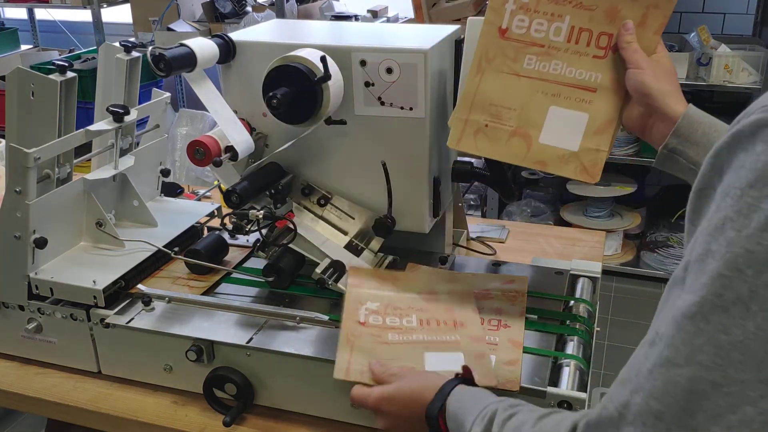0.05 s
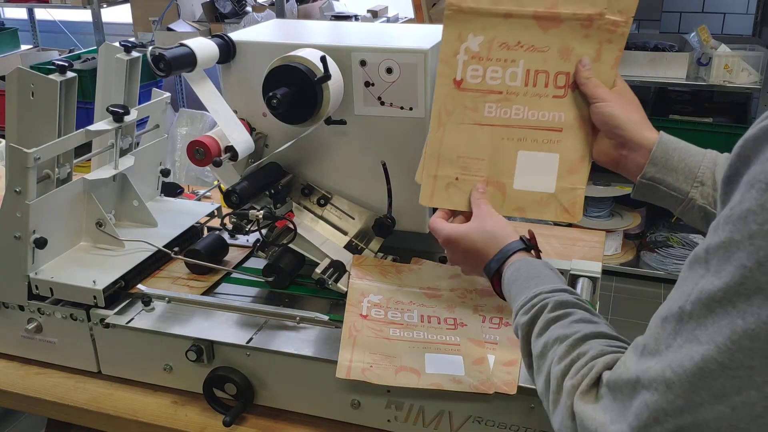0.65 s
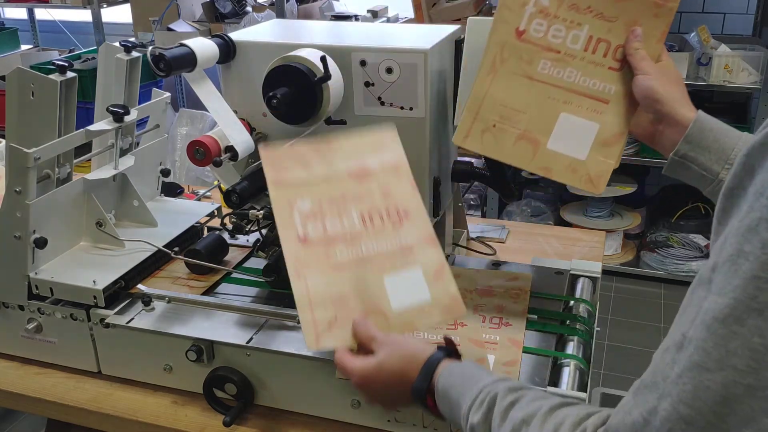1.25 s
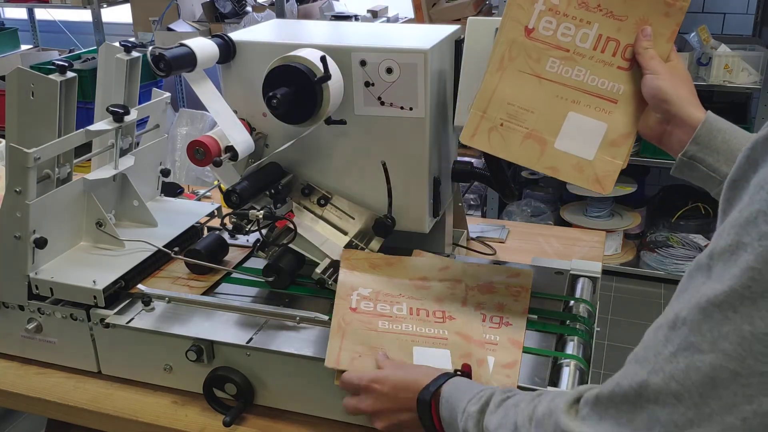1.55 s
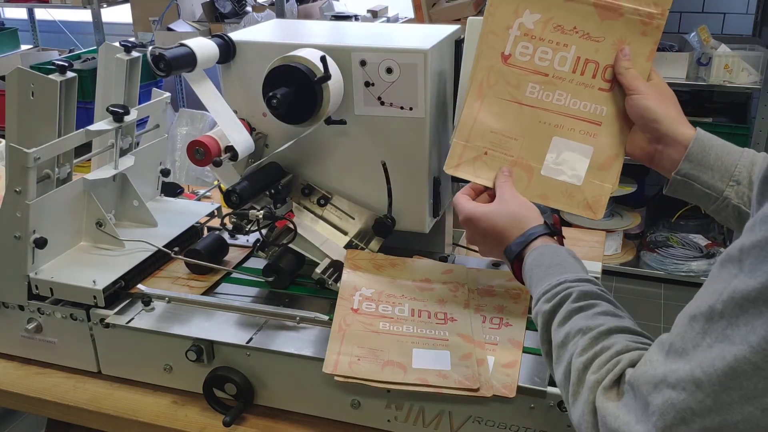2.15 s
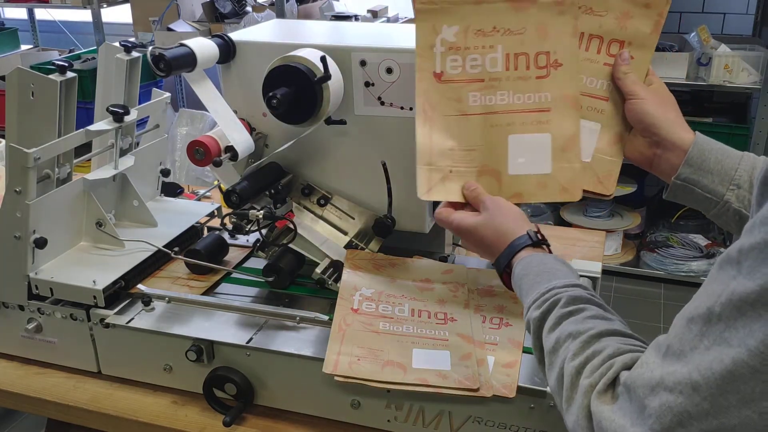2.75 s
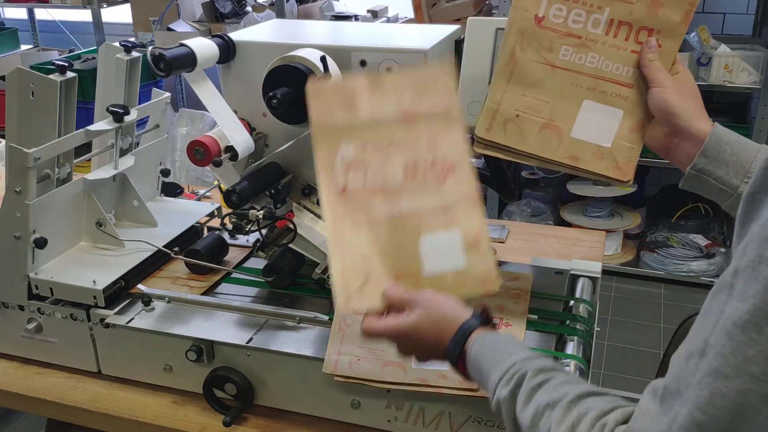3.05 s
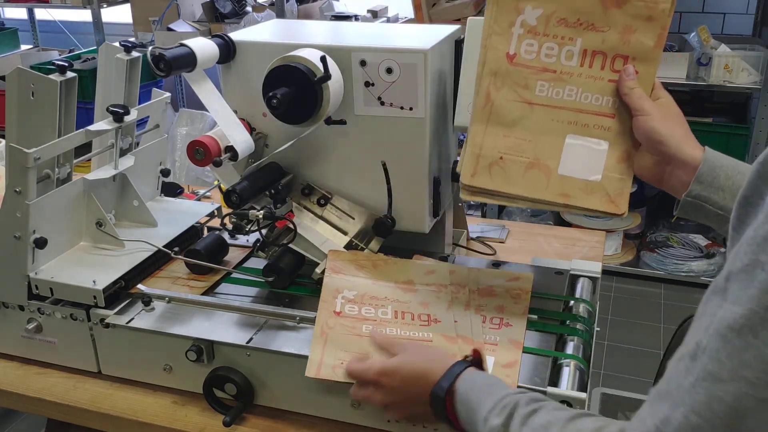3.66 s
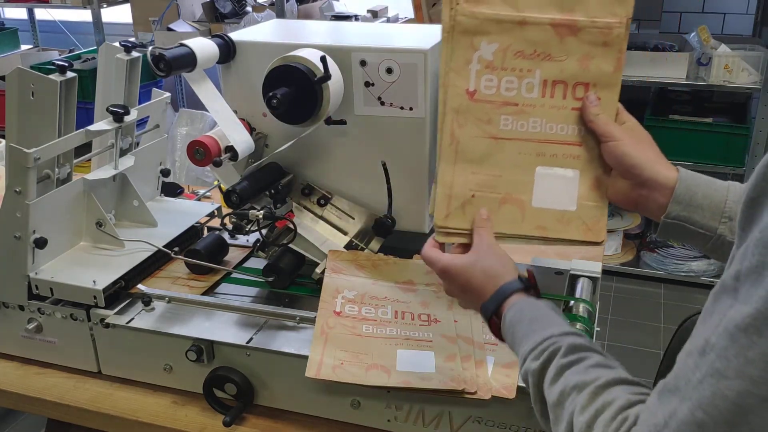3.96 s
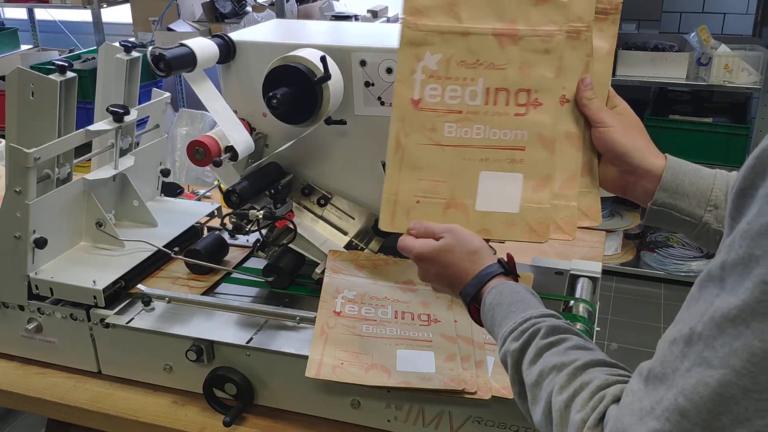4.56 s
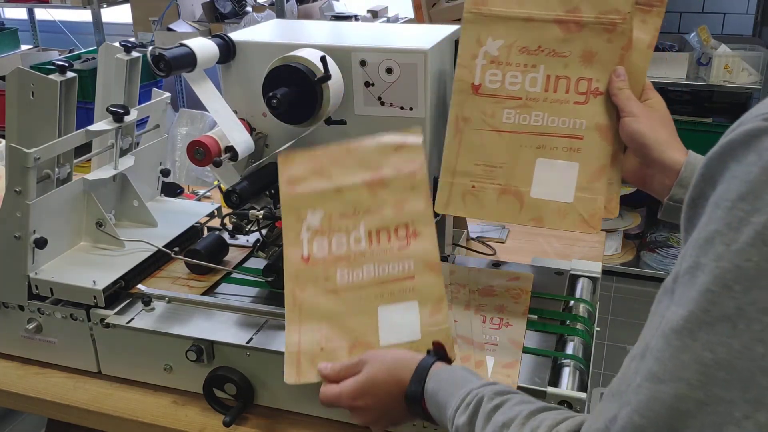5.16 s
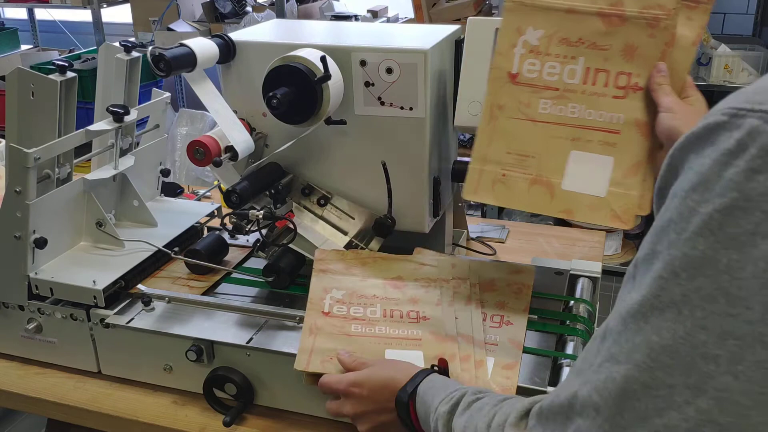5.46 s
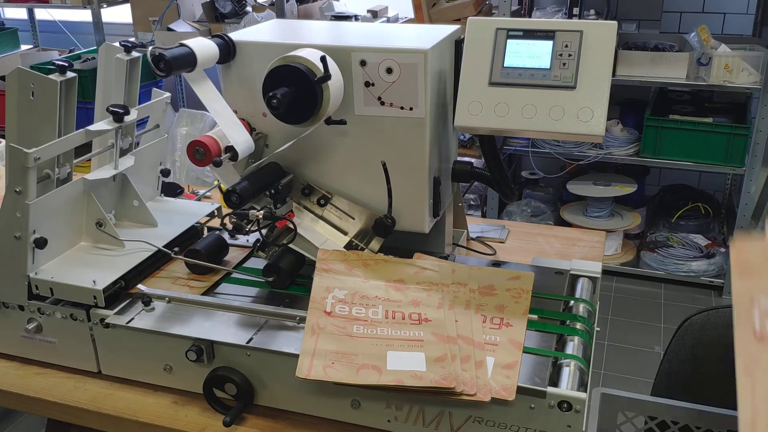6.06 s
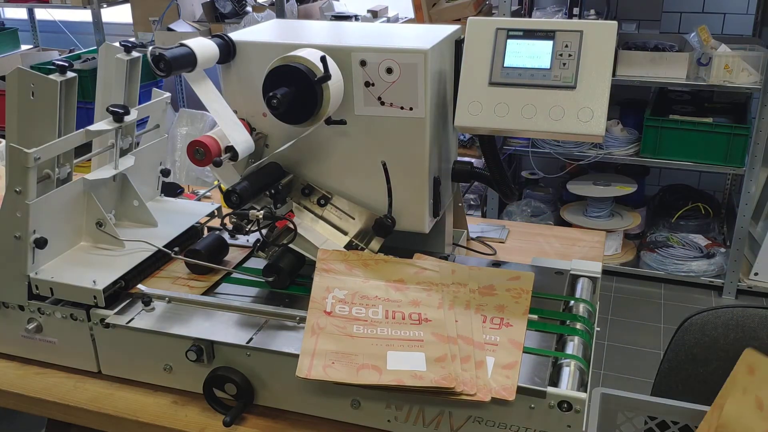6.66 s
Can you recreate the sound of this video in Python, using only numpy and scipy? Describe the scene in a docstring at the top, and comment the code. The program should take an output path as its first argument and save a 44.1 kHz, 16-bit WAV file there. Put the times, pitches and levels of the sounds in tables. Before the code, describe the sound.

In a workshop with a soft steady rush and a faint engine-like hum, paper pouches are handled close by: bright sliding hisses, small crinkles, soft flaps and the brush of a sleeve. A pair of metallic bench knocks comes from farther away early on. Past the middle come two quick knocks and one heavy, ringing blow. The light paper handling carries on to the end.

```python
"""Paper pouches, close to the microphone, slide off a bundle one by one onto the bed of an idle machine.
They hiss as they rub, flap and tick as they flex, and a sleeve brushes along with the arm.
Farther off in the live workshop a metal tool, perhaps a hand press, knocks five times on a bench:
the bench thuds, loose parts clatter, the steel rings thinly. Behind the still air of the room
a faint low hum climbs twice, like an engine outdoors. All is heard in stereo from one spot."""
import sys
import numpy as np
from scipy import signal
from scipy.fft import rfft, irfft, next_fast_len
from scipy.io import wavfile
from scipy.ndimage import uniform_filter1d

SR = 44100
rng = np.random.default_rng(int(sys.argv[2]) if len(sys.argv) > 2 else 0)


def persist_wave(psi):
    """Save psi, clipped to +-1, as 16-bit WAV."""
    counts = np.round(np.clip(psi, -1, 1) * 32767).astype(np.int16)
    wavfile.write(sys.argv[1], SR, np.atleast_2d(counts).T)


N = 304290
T = np.arange(N) / SR
AFTER = T[:SR]  # the second that follows a blow
BRIEF = SR // 3  # samples given to a short paper sound

# Levels in the tables are relative; a balance is left minus right at the microphone.
# reverberation of the workshop: f/Hz, t60/s
WORKSHOP_T60 = [(100, 0.77), (250, 0.49), (500, 0.76), (2000, 0.65), (5000, 0.79), (9000, 0.64),
                (15000, 0.3)]
# still air of the workshop: f/Hz, level/dB
AIR_SPECTRUM = [(12, -48), (20, 2), (70, -2), (96, -10.5), (138, -9.5), (177, -11.5), (337, -18),
                (410, -18.5), (923, -24), (1660, -28.5), (2670, -28), (3440, -29), (4540, -30),
                (6360, -29.5), (16000, -31.5)]
# the air at the microphone: f/Hz, balance/dB
AIR_BALANCE = [(60, 3), (110, 0.5), (200, 0.5), (380, 0.5), (700, 1.5), (1290, 0), (2380, 0), (4400, 4.5),
               (8120, -6.5), (15000, -9)]
# the distant engine speeds up: start/s, end/s, first firing rate/Hz, rise/(Hz per s)
ENGINE_CLIMBS = [(0, 2.2, 56.1, 17.5), (3.5, 6.1, 58.8, 9)]
# its hum, one list for each climb: t/s, level/dB
ENGINE_LEVELS = [
    [(0, -38), (.9, -51.5), (1.55, -44.5), (2.6, -67)],
    [(3.5, -65), (4, -46), (4.75, -60), (5.1, -50), (5.65, -46.5), (6.1, -84)],
]

# tool strokes and rebounds: t/s, thud/dB, clatter/dB, ring/dB, heaviness/(0-1)
TOOL_STROKES = [(1.3785, -2.5, -3.5, -1.5, 0.19), (1.5968, 2, 1.5, 3, 0.21), (3.8011, -0.5, -2.5, -7, 0.1),
                (3.891, -3.5, -6, -25, 0), (4.2389, 12, 11.5, 3, 0.8), (4.257, -6, 3.5, -7, 0.89),
                (4.289, -9.5, 0.5, 0.5, 0.9)]
# modes of the bench: f/Hz, level/dB, t60/s, extra under a heavy stroke/dB
BENCH_MODES = [(129.6, -4.5, 0.048, 3.5), (150, -2, 0.053, -3.5), (168.3, -10.5, 0.17, -2),
               (212.8, -2, 0.093, -12), (310, -7, 0.019, -4), (362.8, -6, 0.092, 1), (410, -2, 0.067, 1.5),
               (454, -7.5, 0.071, 1.5), (544, -23.5, 0.34, -8.5), (663, -18.5, 0.054, 11.5)]
# surfaces near the bench throw the thud back: delay/s, gain
BENCH_ECHOES = [(.0048, 0.16), (0.0192, 0.14), (0.0259, .45), (.05, 0.43)]
# modes of the steel tool: f/Hz, level/dB, t60/s, extra under a heavy stroke/dB
STEEL_MODES = [(3210, -7, 0.12, -3), (3140, -20, 0.2, -3), (3385, -14, 0.1, -7), (4050, -35.5, 0.74, 22),
               (4430, -35, 0.35, 16), (4600, -42.5, .4, 11), (5000, -30.5, 0.21, 20),
               (5310, -26.5, 0.22, 22.5), (5970, -16, 0.35, 3), (8790, 3.5, 0.31, -0.5),
               (10430, 1.5, 0.12, 8), (10350, -2, 0.18, -2), (10750, -16, .4, 9), (11300, -11.5, 0.14, 19)]
# its loose parts: f/Hz, level after a light stroke/dB, level after a heavy one/dB
CLATTER_SPECTRA = [(200, -32, -23), (574, -8, 4.5), (1160, -2.5, -5.5), (1574, -7, -6.5), (2710, -1.5, -5),
                   (3180, 4, -6), (3850, -3.5, -10), (4170, -15, 8.5), (5670, -1, -3.5), (7900, -8, -5),
                   (8760, 0, 0.5), (11620, -5, 0.5), (11306, -16, -15.5), (15500, -19, -3.5)]
# the knocks at the microphone: f/Hz, balance/dB
KNOCK_BALANCE = [(100, 0), (400, 0.5), (2500, 1), (4000, 2.5), (5500, 5.5), (7000, 2), (8300, -16),
                 (10000, -15.5), (12500, -12), (15500, -10)]

# the arm moves the sleeve: start/s, length/s, share spent speeding up/(0-1), level/dB
ARM_STROKES = [(.77, 0.12, 0, -54.5), (.92, 0.27, 0.5, -54), (2.2, 0.87, 0.1, -62.5),
               (2.595, 0.11, 0, -61.5), (2.81, 0.052, .4, -56.5), (3.207, 0.16, 0.02, -55),
               (3.48, 0.28, .3, -58), (3.72, .1, .7, -57), (4.72, 0.35, 0.71, -50), (5.075, 0.25, 0.2, -54),
               (5.35, 0.53, 0.04, -54.5), (5.8, 0.19, 0.04, -61), (6.07, 0.6, 0, -57), (6.36, 1, 0.13, -59)]
# brushing cloth: f/Hz, level/dB
SLEEVE_SPECTRUM = [(200, 9), (450, 7.5), (900, -6), (1800, -2), (3000, 3), (3900, 4.5), (4900, 4.5),
                   (6000, 8.5), (9000, -1.5), (15000, -19)]
# tiny creases: f/Hz, level/dB
CRINKLE_SPECTRUM = [(300, -3.5), (900, 6), (2200, -2.5), (4500, -19), (9000, 3.5), (15500, -15.5)]
# flexing pouches squeak, hoot or puff: centre/s, length/s, f/Hz, level/dB
POUCH_HOOTS = [(.8, 0.055, 516, -47.5), (1.096, .05, 666, -49.5), (1.166, 0.027, 172, -39.5),
               (1.201, 0.026, 170, -46), (1.342, 0.05, 800, -47.5), (3.311, 0.023, 676, -55),
               (4.982, 0.0412, 253, -46.5), (5.684, 0.0116, 397, -41.5), (6.135, .1, 45, -42.5)]
# creases snap and edges tap: t/s, level/dB, centre/Hz, t60/s
PAPER_TICKS = [(2.283, -45, 1940, 0.017), (2.321, -45.5, 2680, 0.022), (2.38, -47.5, 7200, 0.023),
               (2.5222, -46, 2940, 0.016), (3.016, -48, 9250, 0.1), (3.394, -32, 2570, 0.0044),
               (3.404, -40, 2440, 0.079), (3.407, -28, 8600, 0.014), (3.5243, -37.5, 8660, 0.01),
               (5.0833, -48, 1480, 0.15), (5.1733, -43, 3550, 0.02), (5.258, -38, 5100, 0.0054),
               (5.3992, -39, 1950, 0.016), (5.4515, -42.5, 1940, 0.029), (5.562, -43.5, 3420, 0.049),
               (5.6823, -35, 2040, 0.021), (6.1538, -34, 5470, 0.012), (6.194, -50, 2280, 0.087)]
# pouches flap, land or scuff: t/s, body/dB, rustle/dB, t60/s
POUCH_FLAPS = [(0.134, -41, -54, 0.18), (0.147, -53, -40, 0.16), (0.2536, -30, -31.5, 0.2),
               (.283, -32.5, -51, 0.26), (.768, -47.5, -49.5, 0.92), (1.138, -45, -77, 0.9),
               (1.549, -47, -42, 0.23), (3.382, -47, -33, 0.13), (4.639, -49, -41.5, 0.29),
               (4.977, -37, -66, 0.044), (5.513, -36.5, -45, 0.072), (6.651, -51.5, -90, 0.25)]
# air pushed by a flap: f/Hz, level/dB
BODY_SPECTRUM = [(50, -10), (120, 5.5), (210, 4.5), (300, -1.5), (520, -5.5), (1100, -15.5), (3000, -24)]
# the pouch's skin in a flap: f/Hz, level/dB
RUSTLE_SPECTRUM = [(300, -23), (900, -2.5), (2200, 2), (4500, -2.5), (9000, 4), (12000, -4.5), (15500, -16)]
# a pouch slides over its neighbours: start/s, length/s, share spent speeding up/(0-1), level/dB
POUCH_SLIDES = [(.764, 0.031, 0.4, -49), (.83, .3, 0.35, -42), (1.09, 0.05, 0, -65),
                (1.203, 0.021, 0.7, -48), (2.2, 0.18, .45, -61.5), (2.57, .23, 0.3, -48.5),
                (2.8, 0.47, 0.1, -57), (3.205, 0.081, 0.36, -43.5), (3.515, 0.29, 0, -59),
                (3.73, .09, .6, -55), (4.11, 0.14, .45, -47), (4.81, 0.25, 0.12, -48),
                (5.135, 0.26, 0, -55), (5.37, 0.25, 0.73, -53.5), (5.79, 0.36, 0.15, -60.5),
                (6.1, 1, 0.23, -60), (6.785, 0.069, 0.25, -45)]
# paper rubbing on paper: f/Hz, level/dB
SLIDE_SPECTRUM = [(1500, -12), (2500, -7), (5200, -5.5), (6600, -1.5), (9200, 9), (11500, -0.5),
                  (15500, -1.5)]
# paper and sleeve at the microphone: f/Hz, balance/dB
PAPER_BALANCE = [(60, 20), (110, -2.5), (200, -1), (380, 1.5), (700, -1), (1290, 3), (2380, -1),
                 (4400, 6.5), (8120, -7.5), (15000, -20)]


def undb(db):
    """Decibels to gain."""
    return 10 ** (np.asarray(db) / 20)


def along(points, hz):
    """Read (f/Hz, value) points on a logarithmic frequency axis."""
    f, value = np.transpose(points)
    return np.interp(np.log(hz + 1), np.log(f), value)


def shape(x, gain):
    """Filter by a gain that is a function of frequency."""
    size = next_fast_len(x.shape[-1] + 4096)
    return irfft(rfft(x, size) * gain(np.fft.rfftfreq(size, 1 / SR)), size)[..., :x.shape[-1]]


def noise(spectrum, size, alike_below_hz=560):
    """Diffuse noise of rms 1: long waves reach both sides of the microphone alike, short ones do not."""
    length = next_fast_len(size)
    f = np.fft.rfftfreq(length, 1 / SR)
    alike = 1 / (1 + (f / alike_below_hz) ** 2)
    coloured = rfft(rng.standard_normal((2, length))) * undb(along(spectrum, f))
    mid, side = coloured * np.sqrt([1 + alike, 1 - alike])
    x = irfft(np.array([mid + side, mid - side]), length)[:, :size]
    return x / x.std()


def flicker(rate_hz, depth_db, size=N):
    """A random gain with a mean power of 1."""
    steps = rng.standard_normal(size // 8)
    gain = np.interp(T[:size] * rate_hz, np.arange(len(steps)), undb(depth_db * steps))
    return gain / np.sqrt(np.mean(gain ** 2))


def onset(rise_s):
    """Exponential approach to full level after a blow."""
    return 1 - np.exp(-AFTER / rise_s)


def fade(t60):
    """Exponential decay after a blow."""
    return np.exp(-np.log(1000) * AFTER / max(t60, 1e-3))


def add(out, s, x):
    """Mix a sound in at time s."""
    i = max(int(s * SR), 0)
    out[:, i:i + x.shape[-1]] += x[..., :N - i]


def at_microphone(x, balance):
    """Share the power at each frequency between left and right."""
    sides = np.array([[-2], [2]])
    return shape(x, lambda f: np.sqrt(2 / (1 + undb(sides * along(balance, f)))))


def workshop(build_s=0.0018):
    """Room response: dense echoes build up, each octave dying at its own rate."""
    centres = 62.5 * 2 ** np.arange(9)
    echoes = noise([(20, 0), (20000, 0)], SR)
    tail = np.zeros((2, SR))
    for hz, weights in zip(centres, np.eye(len(centres))):
        octave = shape(echoes, lambda f: along(np.c_[centres, weights], f))
        tail += octave * fade(along(WORKSHOP_T60, hz))
    response = rfft(tail * onset(build_s))
    # a cluttered room favours no single note
    colour = np.sqrt(uniform_filter1d(np.abs(response) ** 2, size=41))
    return irfft(response / colour)[:, :SR * 3 // 4]


def reverb(x, room):
    """What the room returns of a sound."""
    return signal.fftconvolve(np.atleast_2d(x), room, axes=1)[:, :x.shape[-1]]


def room_tone(level_db=-54):
    """Still air all round the microphone: a steady low rush."""
    return at_microphone(undb(level_db) * noise(AIR_SPECTRUM, N), AIR_BALANCE)


def distant_engine(top_hz=93, overtone_db=-24):
    """Outdoors: only the firing note and its octave pass the walls, climbing twice, swelling and fading."""
    out = np.zeros(N)
    for (start, end, start_hz, rise), levels in zip(ENGINE_CLIMBS, ENGINE_LEVELS):
        during = (T >= start) & (T < end)
        t = T[during]
        firing_hz = np.minimum(start_hz + rise * (t - start), top_hz)
        phase = 2 * np.pi * np.cumsum(firing_hz) / SR
        swell = undb(np.interp(t, *np.transpose(levels)))
        out[during] += swell * (np.sin(phase) + undb(overtone_db) * np.sin(2 * phase))
    return out


def ring(modes, heavy):
    """Decaying modes of a struck body; a heavy stroke shifts their levels."""
    return sum(undb(db + heavy * extra) * np.sin(2 * np.pi * hz * AFTER) * fade(t60)
               for hz, db, t60, extra in modes)


def bench_thud(heavy, room, give_s=0.0042, level_db=-12.5, room_db=-4, lowest_hz=85):
    """The bench gives and booms, too small to radiate deep bass; surfaces near it repeat the sound."""
    low_cut = signal.butter(3, lowest_hz, "high", fs=SR, output="sos")
    boom = signal.sosfilt(low_cut, ring(BENCH_MODES, heavy) * onset(give_s))
    echoes = sum(gain * np.interp(AFTER - lag, AFTER, boom, left=0) for lag, gain in BENCH_ECHOES)
    return undb(level_db) * (boom + echoes + undb(room_db) * reverb(boom, room))


def clatter(heavy, room, t60=0.22, level_db=-24, room_db=-1, heavy_room_db=2):
    """Loose steel parts chatter for a moment, then the room carries on."""
    spectrum = [(hz, light + heavy * (hard - light)) for hz, light, hard in CLATTER_SPECTRA]
    burst = noise(spectrum, SR) * fade(t60)
    return undb(level_db) * (burst + undb(room_db + heavy * heavy_room_db) * reverb(burst, room))


def steel_ring(heavy, room, level_db=-28.5, room_db=-7):
    """The steel rings; reflections make each mode waver on its own at each side of the microphone."""
    tones = [ring([mode], heavy) for mode in STEEL_MODES]
    steel = np.array([sum(tone * flicker(rate_hz=150, depth_db=5, size=SR) for tone in tones)
                      for side in range(2)])
    return undb(level_db) * (steel + undb(room_db) * reverb(steel, room))


def tool_knocks(room, ring_lag_s=0.0091):
    """Farther off in the room, each stroke thuds and clatters, then rings as the tool reaches its stop."""
    out = np.zeros((2, N))
    for s, thud_db, clatter_db, ring_db, heavy in TOOL_STROKES:
        add(out, s, undb(thud_db) * bench_thud(heavy, room))
        add(out, s, undb(clatter_db) * clatter(heavy, room))
        add(out, s + ring_lag_s, undb(ring_db) * steel_ring(heavy, room))
    return at_microphone(out, KNOCK_BALANCE)


def hand_motion(strokes, curve):
    """Loudness follows the hand's speed: each stroke gathers pace, crests and slows to rest."""
    power = np.zeros(N)
    for s, length, rise, db in strokes:
        crest_s = s + length * np.clip(rise, .05, .95)
        turn = np.interp(T, [s, crest_s, s + length], [0, 1, 2])
        speed = np.abs(np.sin(np.pi / 2 * turn))
        power += undb(2 * db) * speed ** (2 * curve)
    return np.sqrt(power)


def sleeve():
    """Near the microphone, cloth brushes with an uneven grip as the arm moves."""
    brush = noise(SLEEVE_SPECTRUM, N) * flicker(rate_hz=67, depth_db=2)
    return hand_motion(ARM_STROKES, curve=0.72) * brush


def crinkles(per_s=45, spread_db=3, level_db=-7):
    """Tiny creases give way at random, as strongly as the arm moves."""
    gives_way = rng.random(N) < per_s / SR
    snaps = gives_way * undb(spread_db * np.minimum(rng.exponential(size=N), 3))
    crease = noise(CRINKLE_SPECTRUM, BRIEF) * fade(t60=.008)[:BRIEF]
    crackle = reverb(snaps, crease)  # every snap sounds the same short burst
    return undb(level_db) * hand_motion(ARM_STROKES, curve=0.9) * crackle / crackle.std()


def hoots(skirt_ratio=1.73, skirt_db=-18):
    """A flexing pouch briefly sounds one broad resonance of the air it moves."""
    out = np.zeros((2, N))
    for s, length, hz, db in POUCH_HOOTS:
        swell = np.hanning(int(length * SR))
        resonance = [(hz / 3, -60), (hz / skirt_ratio, skirt_db), (hz, 0),
                     (hz * skirt_ratio, skirt_db), (hz * 3, -60)]
        tone = noise(resonance, BRIEF)[:, :len(swell)]
        add(out, s - length / 2, undb(db) * swell * tone / tone.std())
    return out


def ticks(sheet_hz=450, sheet_db=-3, skirt_db=-6, top_db=-21, ring_gain=0.33):
    """A crease snaps, rings briefly at its own pitch and jolts the whole sheet."""
    out = np.zeros((2, N))
    for s, db, hz, t60 in PAPER_TICKS:
        sheet = [(100, -20), (sheet_hz, sheet_db)]
        crease = [(hz / 2, skirt_db), (hz, 0), (hz * 1.45, skirt_db), (hz * 6, top_db)]
        snap = noise(sorted(sheet + crease), BRIEF)
        tone = ring_gain * np.sin(2 * np.pi * hz * T[:BRIEF])
        add(out, s, undb(db) * (snap + tone) * fade(t60)[:BRIEF])
    return out


def flaps(body_rise_s=0.0028, rustle_rise_s=0.0091):
    """A flexing pouch pushes air in a soft bump while its skin crinkles."""
    out = np.zeros((2, N))
    for s, body_db, rustle_db, t60 in POUCH_FLAPS:
        body = undb(body_db) * noise(BODY_SPECTRUM, BRIEF) * onset(body_rise_s)[:BRIEF]
        skin = noise(RUSTLE_SPECTRUM, BRIEF) * flicker(rate_hz=930, depth_db=-0.5, size=BRIEF)
        rustle = undb(rustle_db) * skin * onset(rustle_rise_s)[:BRIEF]
        add(out, s, (body + rustle) * fade(t60)[:BRIEF])
    return out


def sliding_pouches(level_db=2):
    """Close up, paper slides on paper with a bright, grainy hiss as the fibres catch and slip."""
    hiss = noise(SLIDE_SPECTRUM, N)
    for rate_hz, depth_db in [(910, 1.5), (160, 2.5), (35, 2.2)]:
        hiss *= flicker(rate_hz, depth_db)
    return undb(level_db) * hand_motion(POUCH_SLIDES, curve=.8) * hiss


def scene(paper_room_db=-8):
    """One microphone position in the workshop: paper near, knocks farther off, the engine outside."""
    room = workshop()
    close = sliding_pouches() + sleeve() + crinkles() + flaps() + ticks() + hoots()
    paper = at_microphone(close + undb(paper_room_db) * reverb(close, room), PAPER_BALANCE)
    return room_tone() + distant_engine() + tool_knocks(room) + paper


def record(dry, ceiling=.88, top_hz=15780):
    """The recorder rounds the very loudest peaks and cuts the top."""
    rounded = dry / (1 + (dry / ceiling) ** 6) ** (1 / 6)
    high_cut = signal.ellip(10, .2, 80, top_hz, fs=SR, output="sos")
    return signal.sosfilt(high_cut, rounded)


dry = scene()
out = record(dry)
persist_wave(out)
```